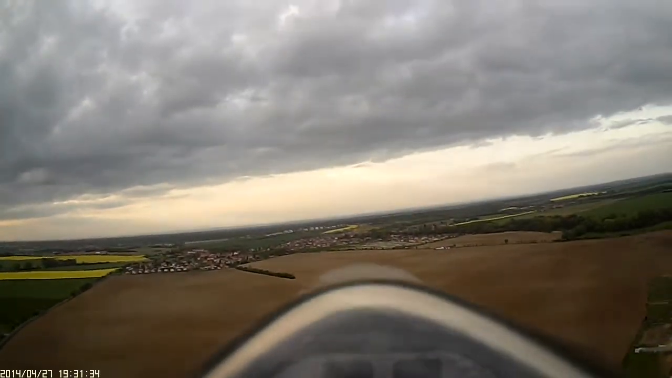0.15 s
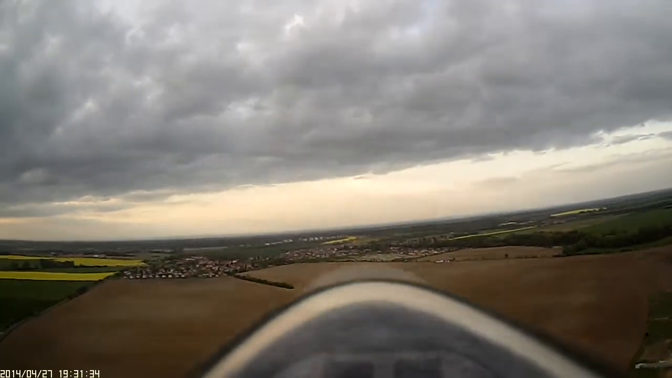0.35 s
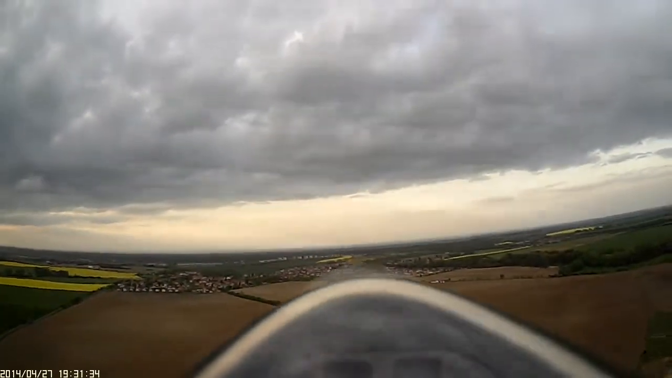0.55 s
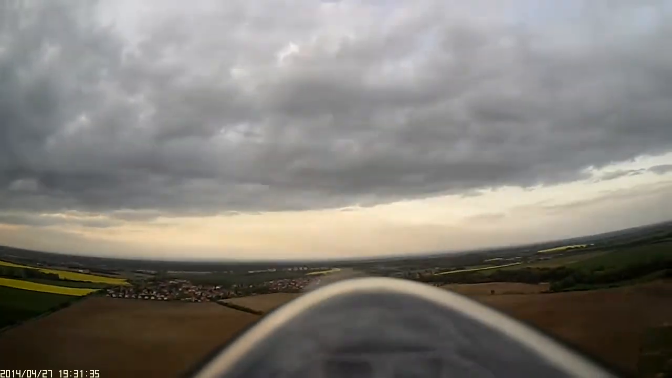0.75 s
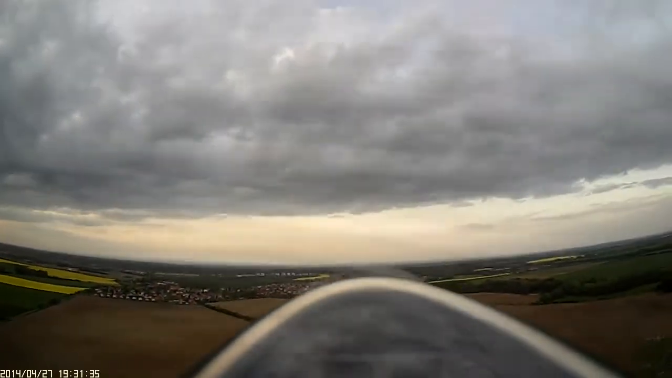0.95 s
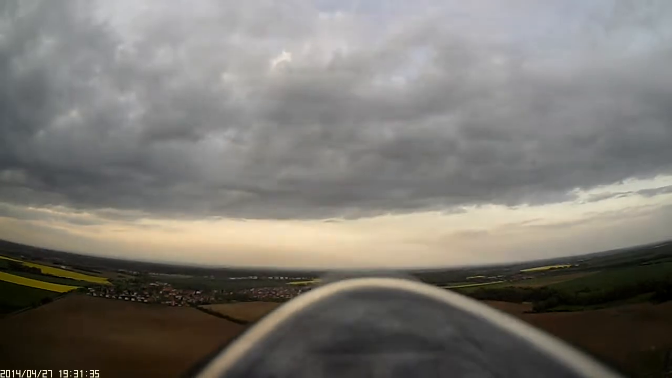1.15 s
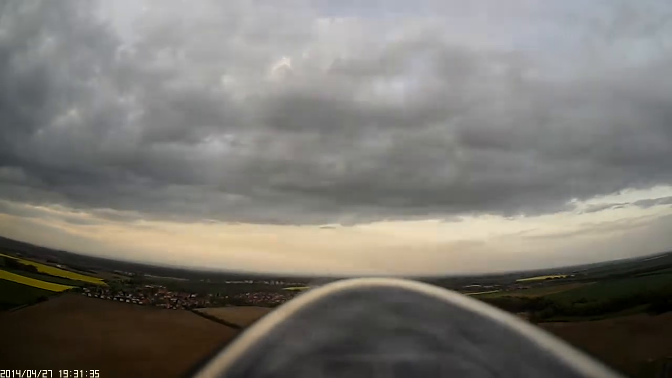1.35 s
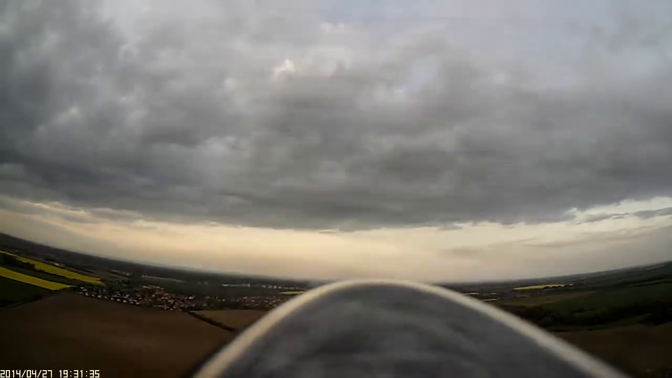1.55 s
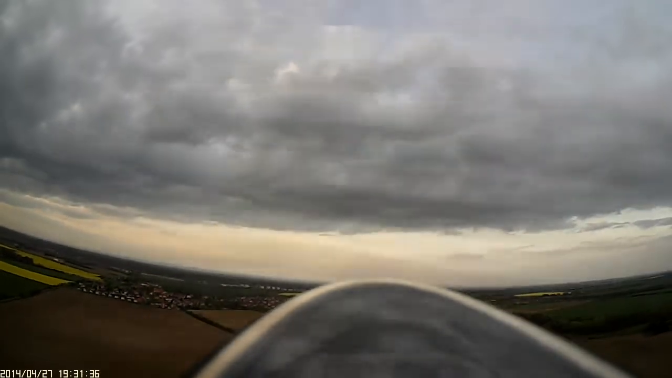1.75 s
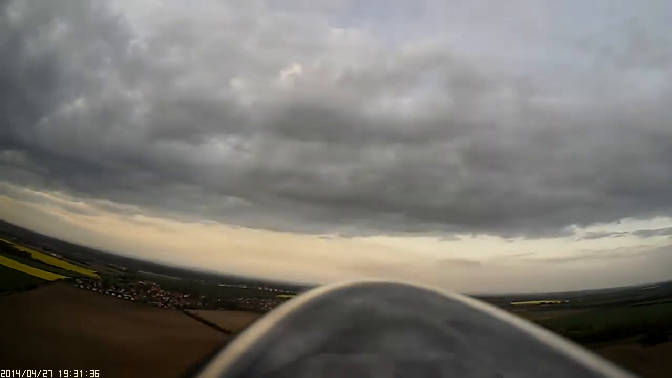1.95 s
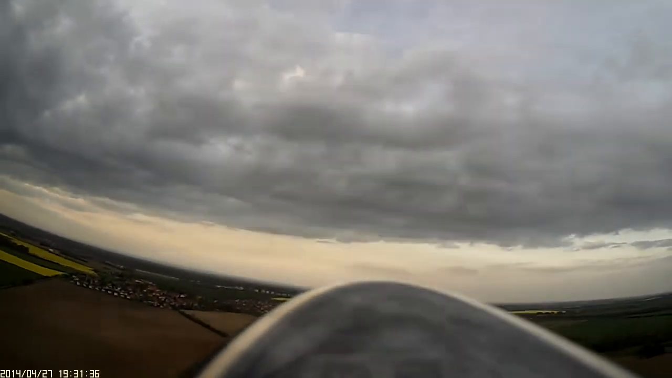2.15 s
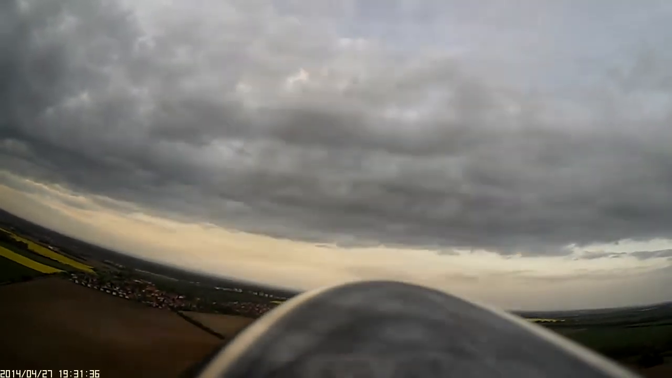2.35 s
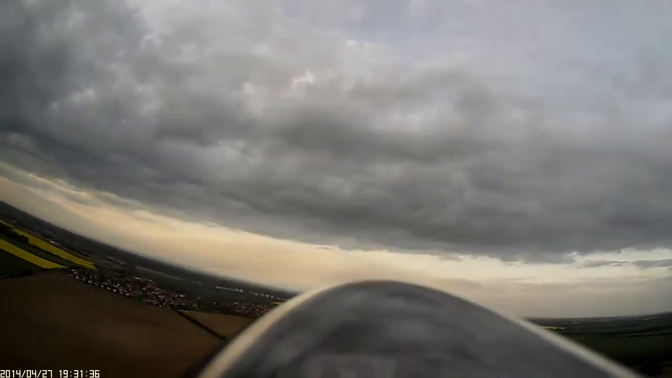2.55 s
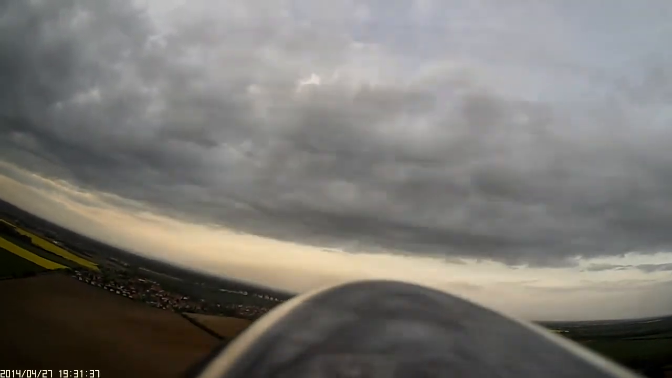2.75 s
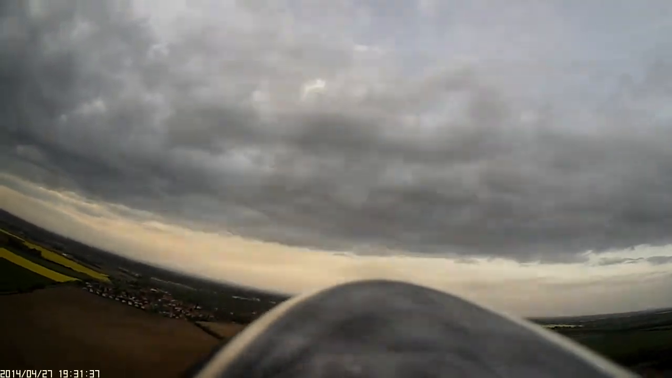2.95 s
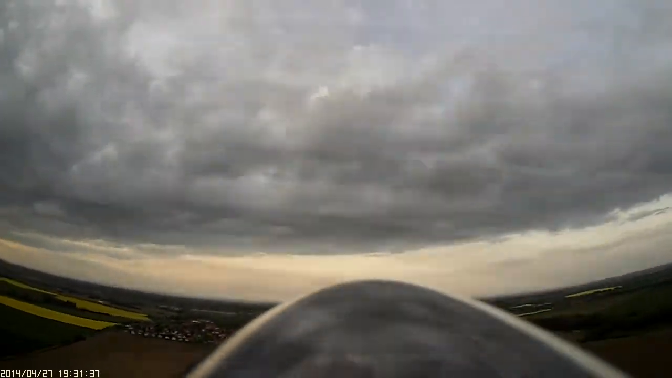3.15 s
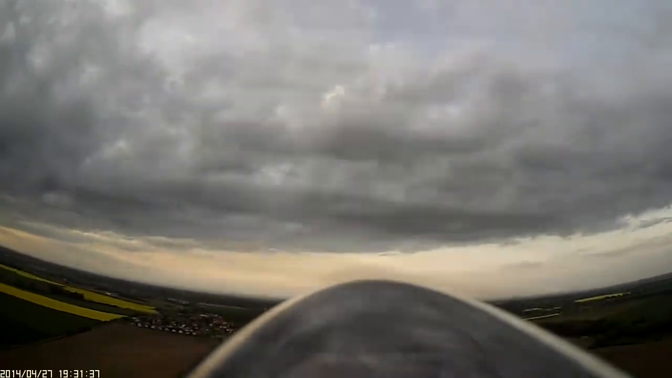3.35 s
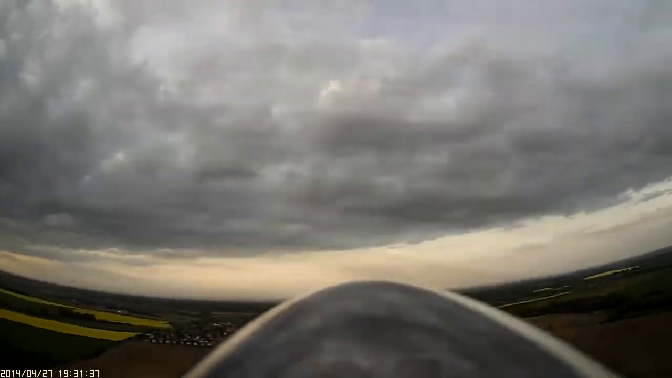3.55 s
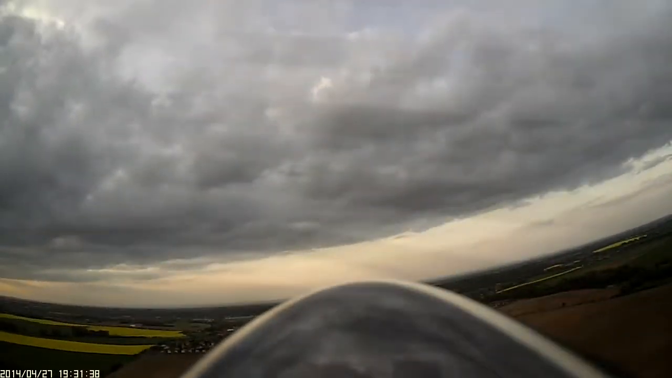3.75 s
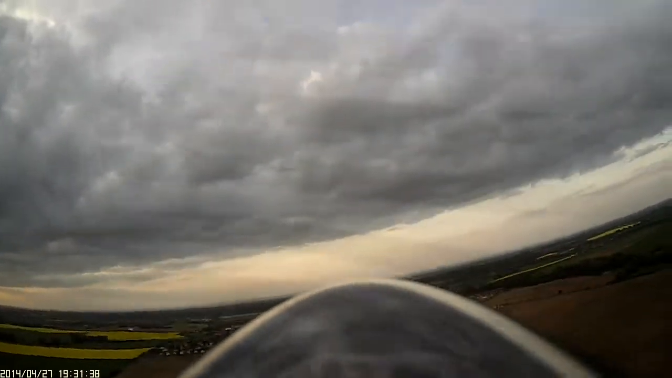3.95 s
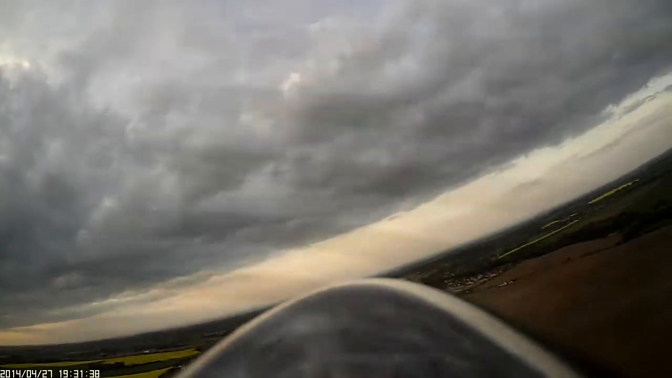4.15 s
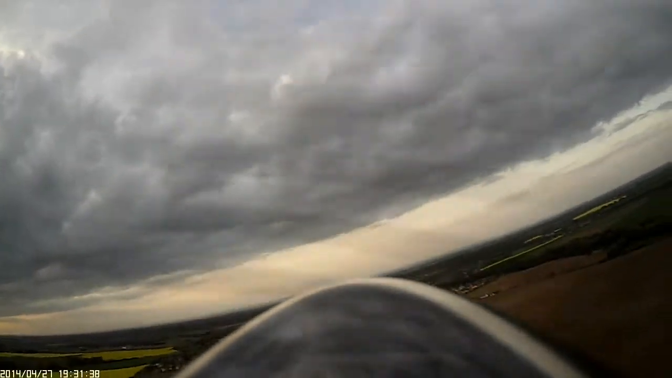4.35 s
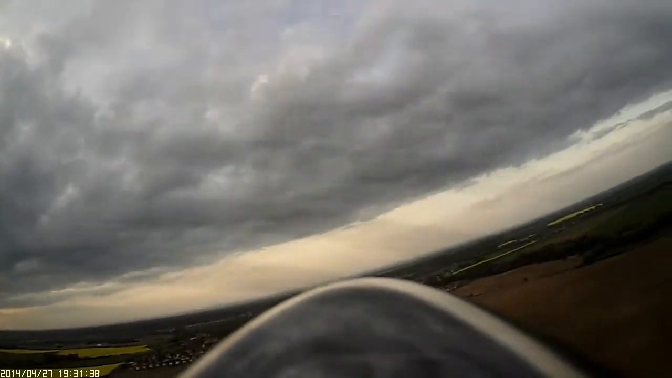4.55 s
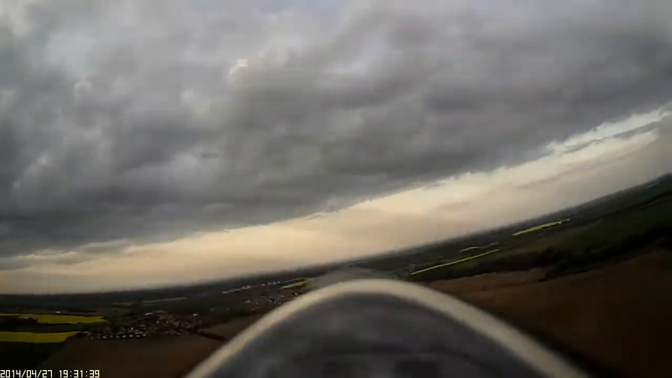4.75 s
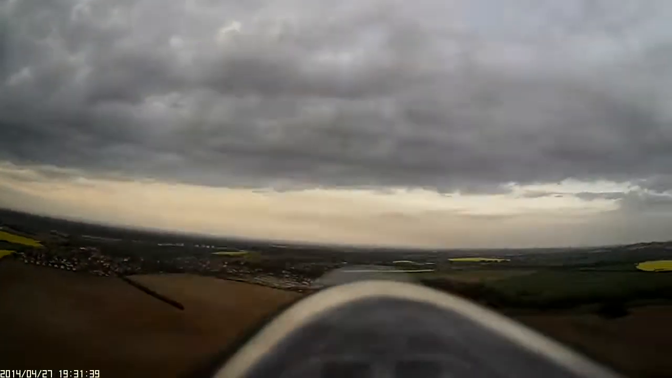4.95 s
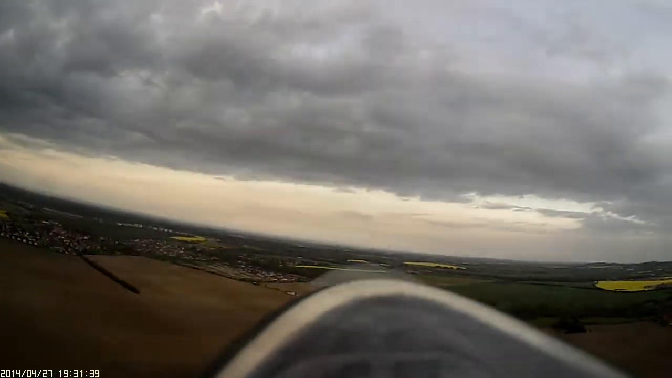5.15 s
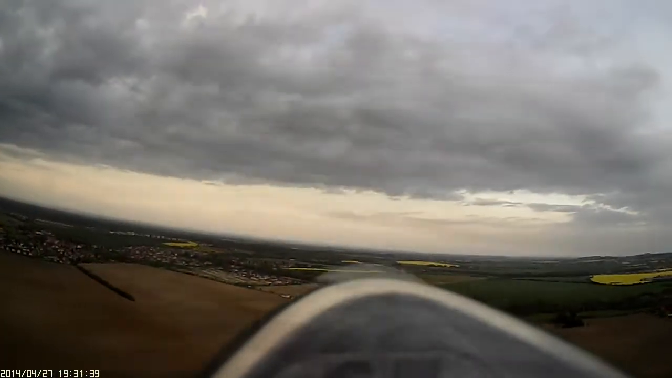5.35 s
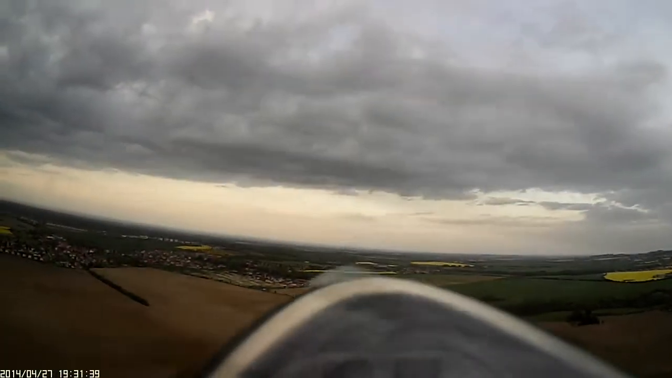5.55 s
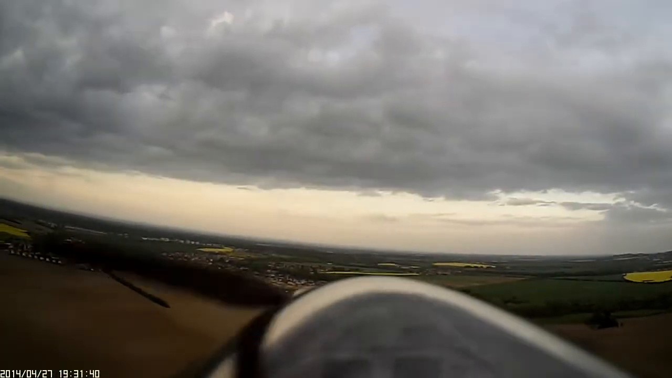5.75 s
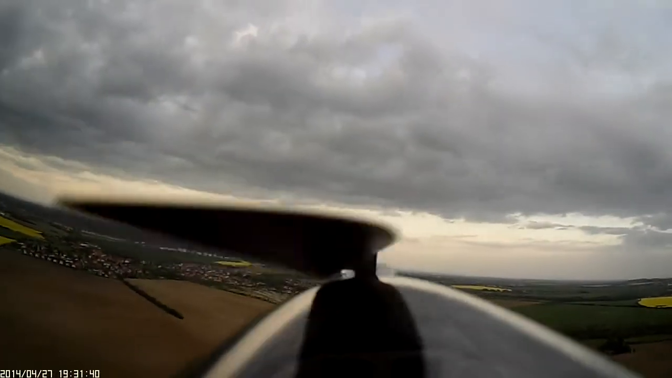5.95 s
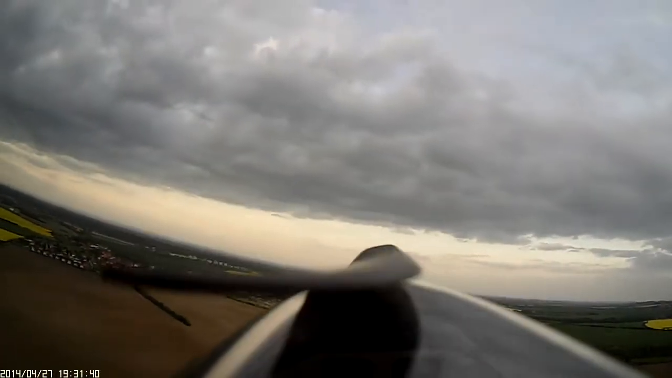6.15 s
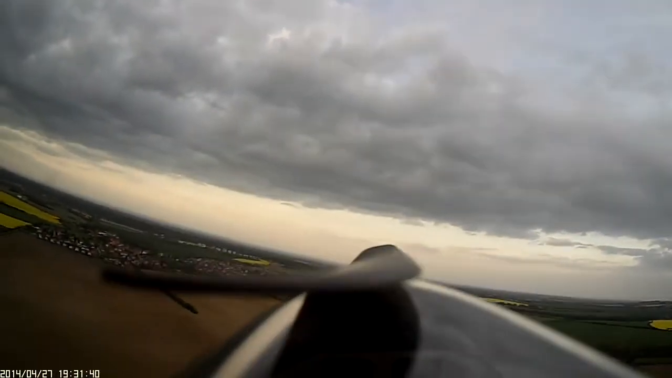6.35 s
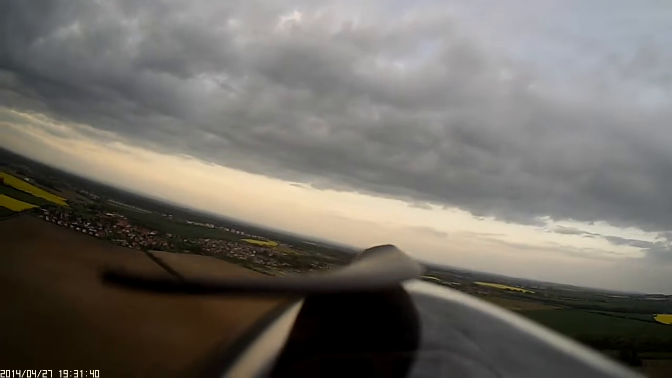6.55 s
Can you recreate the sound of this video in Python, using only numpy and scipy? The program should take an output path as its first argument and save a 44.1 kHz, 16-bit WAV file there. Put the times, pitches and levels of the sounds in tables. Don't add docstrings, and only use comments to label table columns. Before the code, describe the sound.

On board a small electric model aircraft in open sky, a microphone right behind the propeller is battered by harsh, overloaded wash, a rough roar fluttering rapidly with the blades. A thin electronic whine hides behind it. After about five seconds the motor is cut and the roar collapses; tiny high squeaks and irregular low thumps follow, then a sharp tick as the blades fold, leaving faint airflow.

```python
import sys
import numpy as np
from scipy import signal
from scipy.fft import rfft, irfft, next_fast_len
from scipy.io import wavfile
from scipy.ndimage import uniform_filter1d, map_coordinates

SR = 44100
rng = np.random.default_rng(int(sys.argv[2]) if len(sys.argv) > 2 else 0)


def generate_wav(signal):
    frames = np.transpose(np.atleast_2d(signal))
    scaled = np.clip(frames, -1, 1) * 32767
    pcm = np.round(scaled).astype(np.int16)
    wavfile.write(sys.argv[1], SR, pcm)


def magnitude_from_level(level_db):
    exponent = np.asarray(level_db, float) / 20
    return 10 ** exponent


N = 291059

# (time [s], flow [dB], shedding rate of the rim's vortices [Hz])
AIR = [(0, 0, 339.7), (1, 0, 344.9), (1.5, -1.5, 285.2), (2.4, -2, 335.1), (3, -3.5, 319.5),
       (3.6, -4.5, 265), (4.35, -6, 275.5), (4.7, -3.5, 330.2), (4.95, -8, 539.3), (5.2, -9, 735),
       (5.51, -16, 610), (5.6, -25.5, 398.7), (5.74, -20, 349), (5.805, -25.5, 350), (5.89, -20, 355),
       (6.06, -20.5, 350), (6.22, -25.5, 340), (6.6, -30, 300)]
# (time [s], peak [dB], swirl [Hz])
BLADE_WAKES = [(5.5295, -6, 450), (5.5395, -6, 450), (5.5455, -7, 450), (5.5555, -10, 330),
               (5.566, -6, 330), (5.586, -8, 450), (5.6135, -10, 150), (5.6315, -7, 230), (5.653, -4, 230),
               (5.681, -11, 130), (5.7165, -7, 250), (5.722, -4, 190), (5.776, -8, 190), (5.7845, -6, 120),
               (6.301, -12, 190)]
# (time [s], peak [dB], dull part over the peak [dB])
BLADE_TICKS = [(5.6145, -44, 10), (5.6316, -42, 14), (5.652, -49, 16), (5.663, -52, 10), (5.6795, -42, 8),
               (5.7225, -50, 14), (5.7757, -38, 17), (5.9142, -8, -20), (5.936, -46, 6), (6.2972, -52, 16),
               (6.4846, -59, 19), (6.551, -59, 20)]
# (time [s], start pitch [Hz], end pitch [Hz], level [dB])
SQUEAKS = [
    (5.467, 14900, 14500, -55),
    (5.483, 14400, 13900, -54),
    (5.497, 10450, 10350, -52),
    (5.513, 13800, 13000, -53),
    (5.53, 13600, 13000, -50),
    (5.54, 11800, 10700, -52),
    (5.549, 12800, 12200, -53),
]
# (centre [Hz], width [Hz], level [dB])
BLADE_MODES = [(4200, 5000, 2), (5500, 1800, -6), (8100, 2000, 0), (13500, 1500, -18)]
# (frequency [Hz], density [dB])
BUFFET_COLOUR = [(10, -51), (20, -15), (60, -4), (190, 1.5), (400, -7), (800, -14), (1500, -120)]
# (frequency [Hz], density [dB])
EDDIES_COLOUR = [(100, -50), (250, -6), (500, 0), (900, -3), (1600, -10), (2600, -22), (5000, -60),
                 (9000, -120)]
# (frequency [Hz], density [dB])
HISS_COLOUR = [(300, -47), (800, -2.5), (1300, -4), (2000, -5.5), (3000, -10), (4200, -16), (6300, -25),
               (9000, -31.5), (15500, -43)]
# (frequency [Hz], density [dB])
VORTEX_COLOUR = [(60, -60), (170, -14), (300, 0), (480, -12), (1200, -50), (2400, -120)]
# (frequency [Hz], density [dB])
HASH_COLOUR = [(3000, -30), (6000, -10), (9000, -4), (11500, -1), (13500, 0), (14800, -3), (15700, -10)]

# (full flow [dB], slope [dB per dB of flow], slope [dB per octave of shedding over 300 Hz])
BUFFET_LAW, EDDIES_LAW = (-8.5, 0.32, -4.5), (-8, 0.55, 2.01)
HISS_LAW, VORTEX_LAW = (-10, 0.98, .1), (-11, .8, 6.5)


def wash():
    blade_hz, spin = propeller()
    turn = 2 * np.pi * np.cumsum(blade_hz + 0.36 * wobble(5.97)) / SR
    throb_depth = .38
    beat = 1 + np.clip(throb_depth * spin, 0, .9) * np.cos(turn)
    thrust = blade_hz / blade_hz.max()
    coasting = 1 - thrust
    bursts = 0.5 * wobble(25) + 0.92 * wobble(120) + 3.4 * wobble(450)
    bursts = bursts * (.8 + .2 * thrust)

    braked_db, wash_db = -6, 3.5
    sheltered_db = braked_db * dip(5.46, half_s=.19) - wash_db * coasting
    buffet = strength(BUFFET_LAW) * magnitude_from_level(sheltered_db) * rush(BUFFET_COLOUR, 0.62 * wobble(15))

    eddies = strength(EDDIES_LAW) * rush(EDDIES_COLOUR, 0.36 * bursts + 0.2 * wobble(18))

    spit_db = 2.0 + 1.4 * coasting
    hiss = strength(HISS_LAW) * rush(HISS_COLOUR, 0.51 * bursts + spit_db * wobble(700))
    dull_hiss = filtered(hiss, lambda hz: 1 / (1 + (hz / 8500) ** 2))
    hiss = thrust * hiss + coasting * dull_hiss

    tone = np.sin(turn + 1.83) + 0.43 * np.sin(turn / 2)
    tone = magnitude_from_level(-18.5 + 0.83 * wobble(4.1)) * spin ** 2.5 * tone

    shade = 1 - 0.83 * dip(5.9555, half_s=.004)
    return shade * (beat ** 0.99 * buffet + beat * (eddies + vortices()) + beat ** .5 * hiss + tone)


def vortices():
    shedding_hz = curves(AIR)[1] * magnitude_from_level(.7 * wobble(25))
    carried = np.cumsum(shedding_hz / 300)
    street = map_coordinates(rush(VORTEX_COLOUR, 0), [carried], mode="grid-wrap")
    return strength(VORTEX_LAW) * street


def propeller():
    t = np.arange(N) / SR
    cut_s, rundown_s = 5.2, .37
    start_hz, sag_hz_per_s, loaded_hz = 205, 2.4, 195.7
    spin = np.exp(-(np.maximum(t - cut_s, 0) / rundown_s) ** 2)
    return np.maximum(start_hz - sag_hz_per_s * t, loaded_hz) * spin, spin


def wakes():
    out = np.zeros(N + SR)
    half = SR // 50
    t = np.arange(-half, half) / SR
    for s, db, swirl_hz in BLADE_WAKES:
        turns = swirl_hz * t
        swell = np.exp(-(2.2 * (turns - .04)) ** 2)
        out[round(s * SR) - half:][:len(t)] -= magnitude_from_level(db + .7) * swell * np.sin(2 * np.pi * turns)
    return out[:N]


def ticks():
    bright, dull = np.zeros(N + SR), np.zeros(N + SR)
    t = np.arange(SR // 20) / SR
    decay = magnitude_from_level(-60 * t / .005) + .07 * magnitude_from_level(-60 * t / .03)
    for s, db, dull_db in BLADE_TICKS:
        crack = decay * np.sign(rng.standard_normal(len(t)))
        start = round(s * SR)
        bright[start:][:len(t)] += magnitude_from_level(db + 2) * crack
        dull[start:][:len(t)] += magnitude_from_level(db + dull_db + 1) * crack

    def mode(hz, centre_hz, width_hz, db):
        damping = 1j * hz * width_hz
        return magnitude_from_level(db) * damping / (centre_hz ** 2 - hz ** 2 + damping)

    low, *high = BLADE_MODES

    def blade(hz):
        return sum((-1) ** k * mode(hz, *m) for k, m in enumerate(high))

    return filtered(bright[:N], blade) + filtered(dull[:N], lambda hz: mode(hz, *low) ** 2)


def controller():
    t, spin = np.arange(N) / SR, propeller()[1]
    after = np.maximum(t - 5.552, 0)
    on = np.maximum(magnitude_from_level(-900 * after), magnitude_from_level(-19 - 190 * after))

    whine_hz = 9150 - 11 * t + 1.5 * wobble(20)
    whine = np.sqrt(2) * np.sin(2 * np.pi * np.cumsum(whine_hz) / SR)
    swell_db = 4 * dip(2.9, half_s=.6)
    whine = magnitude_from_level(-55 + swell_db + 3.0 + wobble(4)) * spin ** 3.2 * whine

    hash_db = -43 - 1.1 * t + 5.0
    switching_hash = magnitude_from_level(hash_db) * spin ** .45 * rush(HASH_COLOUR, 2.3 * wobble(200))
    return on * (whine + switching_hash) + squeaks()


def squeaks():
    out = np.zeros(N)
    length = SR // 90
    for s, start_hz, end_hz, db in SQUEAKS:
        sweep = np.sin(2 * np.pi * np.cumsum(np.linspace(start_hz, end_hz, length)) / SR)
        out[round(s * SR) - length // 2:][:length] += magnitude_from_level(db + 3) * np.hanning(length) * sweep
    return out


def input_hiss():
    return magnitude_from_level(-74) * rng.standard_normal(N)


def strength(law):
    flow_db, shedding_hz = curves(AIR)
    full_db, per_flow_db, per_octave_db = law
    return magnitude_from_level(full_db + per_flow_db * flow_db + per_octave_db * np.log2(shedding_hz / 300))


def rush(spectrum, lumps_db):
    f, db = np.transpose(spectrum)

    def colour(hz):
        return magnitude_from_level(np.interp(np.log(hz + 1), np.log(f + 1), db))

    return unit(filtered(magnitude_from_level(lumps_db) * rng.standard_normal(N), colour))


def wobble(rate):
    knots = rng.standard_normal(int(N * rate / SR) + 4)
    return map_coordinates(knots, [np.arange(N) * rate / SR])


def dip(s, half_s):
    return np.exp(-((np.arange(N) / SR - s) / half_s) ** 2)


def curves(rows):
    s, *cols = np.transpose(rows)
    return [np.interp(np.arange(N) / SR, s, c) for c in cols]


def filtered(x, response):
    m = next_fast_len(N + SR // 2)
    return irfft(rfft(x, m) * response(np.fft.rfftfreq(m, 1 / SR)), m)[..., :N]


def unit(x):
    return x / np.sqrt(np.mean(x ** 2) + 1e-20)


def scene():
    return (wash() + wakes() + ticks() + controller() + input_hiss())[None]


def low_pass(x):
    return signal.sosfilt(signal.butter(12, 15710, fs=SR, output="sos"), x)


def record(dry):
    top, hardness = .69, 24
    dry = dry - 0.055 * (dry ** 2 - uniform_filter1d(dry ** 2, SR // 10))
    clipped = dry / (1 + np.abs(dry / top) ** hardness) ** (1 / hardness)

    def stage(hz):
        coupling = 1j * hz / (4 + 1j * hz)
        return coupling / (1 + 1j * hz / 12000)

    mix = filtered(clipped, stage) - .003
    return low_pass(mix)


dry = scene()
out = record(dry)
generate_wav(out)
```